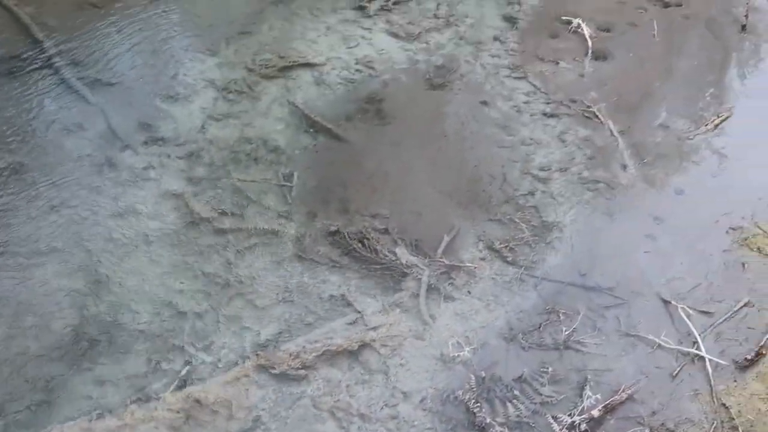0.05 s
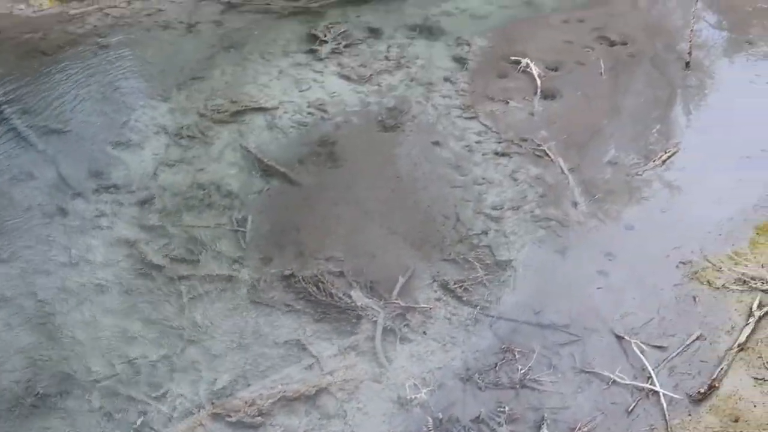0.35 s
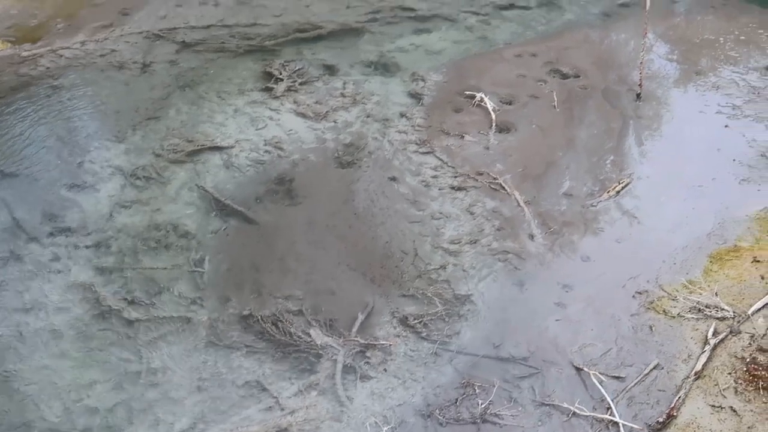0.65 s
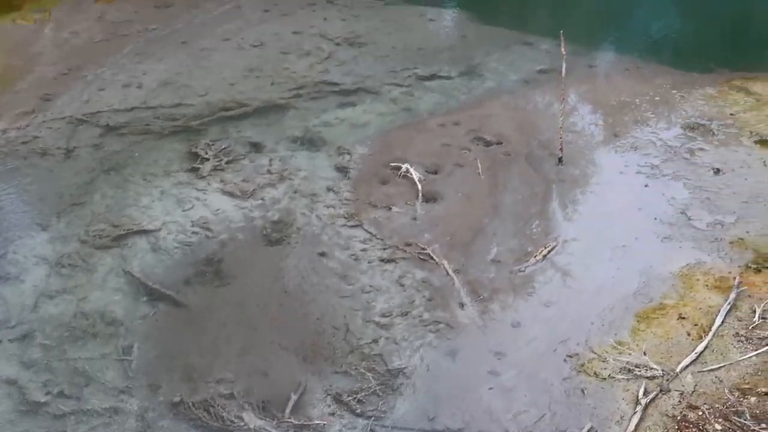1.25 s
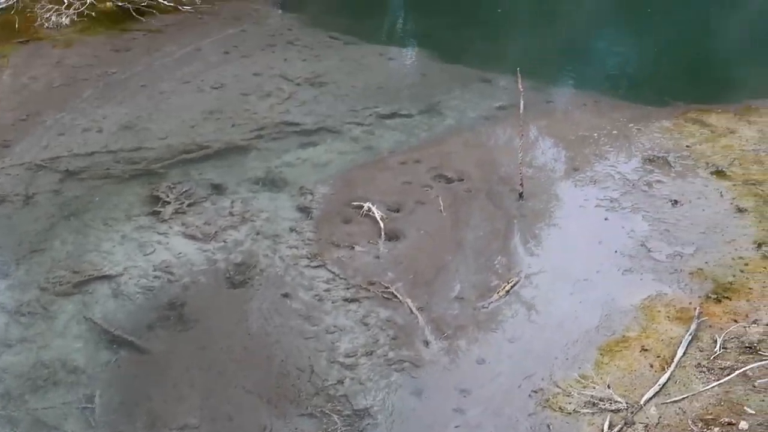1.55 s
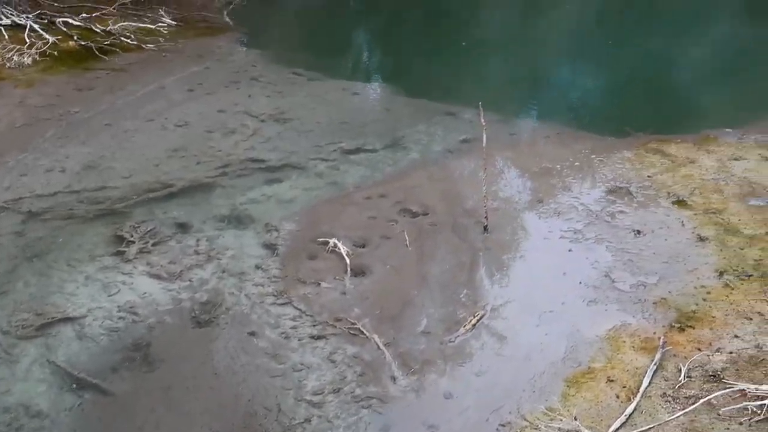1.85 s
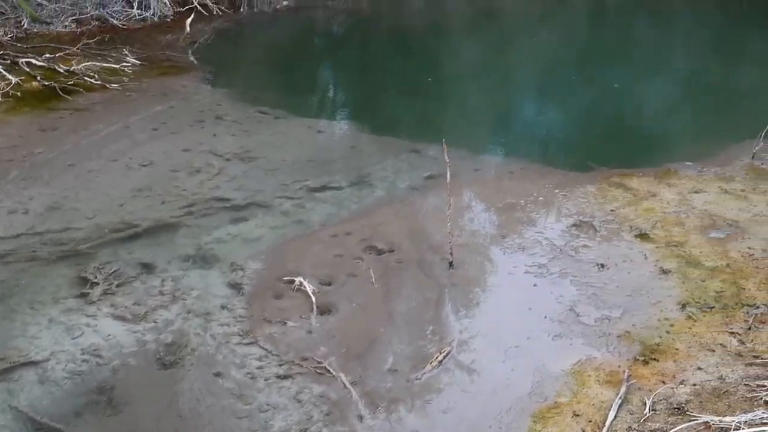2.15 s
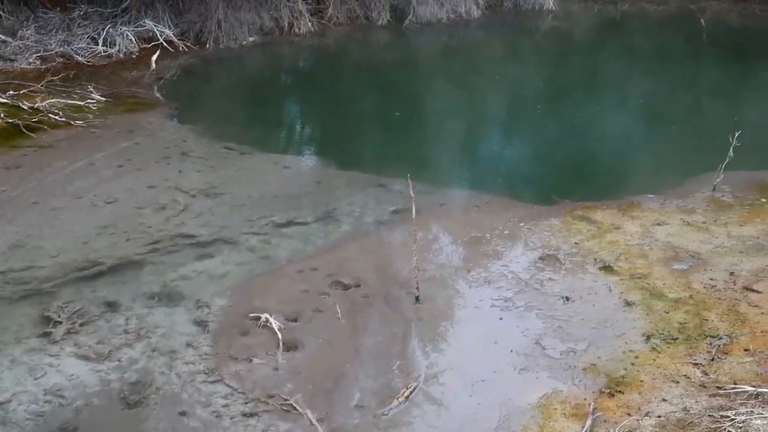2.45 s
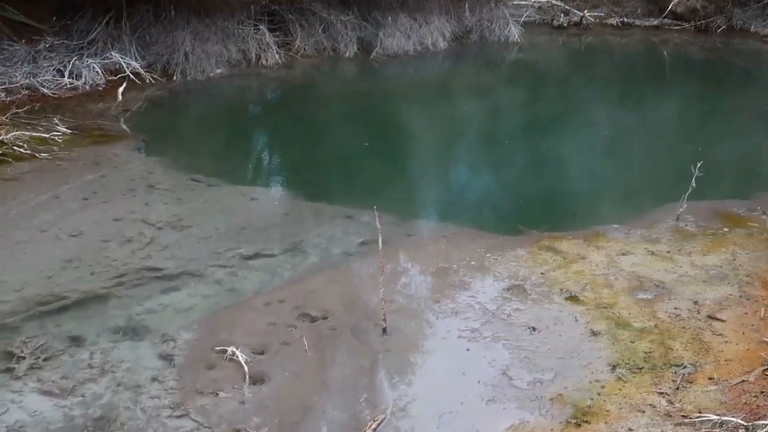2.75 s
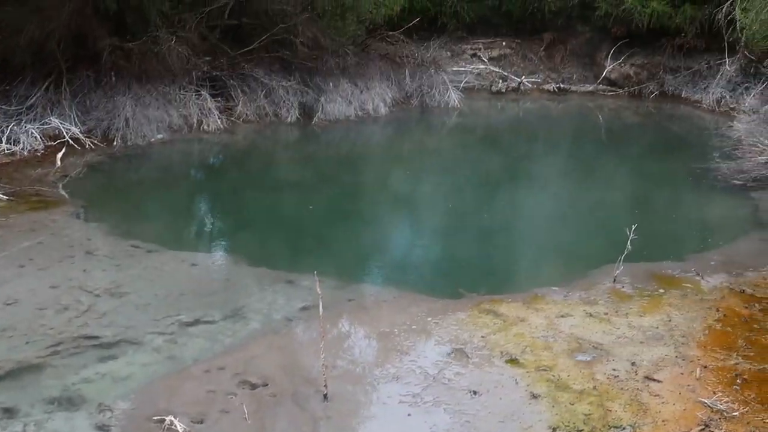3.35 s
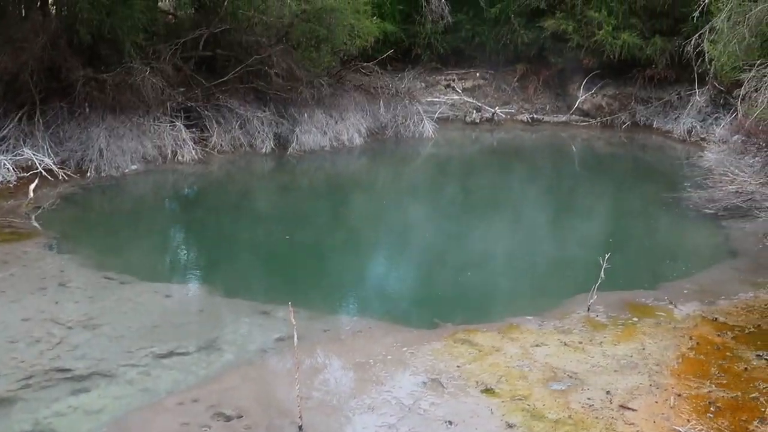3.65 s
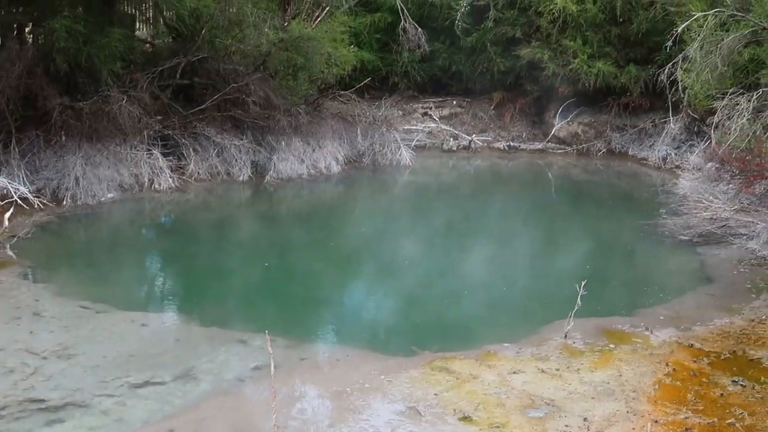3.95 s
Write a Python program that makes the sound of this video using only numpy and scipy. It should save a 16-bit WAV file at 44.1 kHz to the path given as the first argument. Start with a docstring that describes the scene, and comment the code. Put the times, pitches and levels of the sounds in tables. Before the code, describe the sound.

Close plops and wet spatters pop out of simmering mud and water at a hot spring, busy at first, then sparser and fainter. A wide steam hiss fades with them, while a faint breeze rumbles on the microphone outdoors.

```python
"""Plops of hot mud and water, close up, over a dense simmer at the edge of a geothermal pool.
Each gas bubble rings as it surfaces; some glug through a neck of mud, others burst into spatter.
Steam hisses behind them, and light wind bumps the stereo microphone out in the open.
The bubbling grows fainter as the microphone turns away."""
import sys
import numpy as np
from scipy import signal
from scipy.fft import rfft, irfft, next_fast_len
from scipy.io import wavfile
from scipy.ndimage import map_coordinates

SR = 44100
rng = np.random.default_rng(int(sys.argv[2]) if len(sys.argv) > 2 else 0)


def dump_mix(stems):
    """Bounce the given channels to the path in sys.argv[1] as a 16-bit WAV at rate SR."""
    frames = np.atleast_2d(stems).T  # one column per channel
    limited = np.clip(frames, -1, 1)  # hard clip at full scale
    pcm = np.round(limited * 32767).astype(np.int16)
    wavfile.write(sys.argv[1], SR, pcm)


N = 176400

# stereo width of the pool: frequency_hz, side_over_mid_db
POOL_WIDTH = [(100, -27), (500, -16), (1000, -15), (2500, -8.5), (4500, -4), (6500, -1), (9000, 2),
              (12000, 8.5)]
# how the near sounds lean left or right with their pitch: pitch_hz, left_over_right_db
NEAR_PAN = [(300, -4), (650, -0.5), (900, 3.5), (1400, 4.5), (2600, 0)]
# breeze between puffs: time_s, level_db
BREEZE_LEVEL = [(0, -36), (1.5, -48), (2.5, -42), (3.1, -43), (4, -35.5)]
# its rumble on the microphone: frequency_hz, gain_db
BREEZE_COLOUR = [(12, -48), (35, 5), (110, 7), (200, -3.5), (800, -65)]
# its stereo width: frequency_hz, side_over_mid_db
BREEZE_WIDTH = [(30, -20), (140, -12)]
# puffs hitting the microphone: peak_s, half_length_s, level_db, pitch_hz
PUFFS = [(0.091, 0.011, -23.5, 87.5), (0.246, 0.016, -23, 89), (0.293, 0.018, -17, 58.7),
         (0.719, 0.0044, -21, 90), (1.394, 0.054, -25, 59.4), (1.591, 0.022, -27.5, 76.5),
         (2.306, 0.029, -28, 54.3), (2.51, 0.048, -24.5, 85), (3.311, 0.019, -28.5, 75.5),
         (3.377, 0.015, -28, 89), (3.82, 0.022, -30.5, 121), (3.927, 0.02, -26, 118)]
# fading steam: time_s, level_db
STEAM_LEVEL = [(0, -44), (2.3, -46.5), (3.2, -50), (4, -55)]
# its hiss: frequency_hz, gain_db
STEAM_COLOUR = [(1500, 0.5), (3000, 1.5), (4300, -3), (5300, 3.5), (6800, 6.5), (8000, 2.5), (10000, -2.5),
                (12000, -10.5), (15500, -46)]
# strength of the simmer: time_s, bubbles_db, spatter_db
SIMMER_LEVEL = [(0, -35.5, -43.5), (.26, -31, -42), (.5, -35.5, -55), (.78, -33, -40), (1.55, -38, -53),
                (1.8, -36, -47.5), (2.6, -39, -52.5), (2.9, -39, -54.5), (4, -46, -56.5)]
# tone of its small bubbles: frequency_hz, gain_db
SIMMER_COLOUR = [(320, 0), (460, -6), (750, 2.5), (1050, -4), (5000, 8)]
# far bubbling run together: frequency_hz, gain_db
WASH_COLOUR = [(100, 2.5), (300, -6.5), (460, -22), (720, -9), (1100, -16.5), (2900, -22), (4500, -43.5)]
# tiny bubbles popping close by: start_s, centre_hz, level_db
TICKS = [(.388, 2200, -28), (.469, 2300, -20), (.889, 10000, -35), (1.416, 1500, -28), (1.820, 2800, -33),
         (2.1496, 1900, -30), (2.2015, 2190, -31), (2.437, 3100, -31), (2.668, 1600, -29),
         (2.7687, 2500, -31), (2.852, 3200, -34), (3.182, 2800, -31), (3.248, 1800, -34),
         (3.526, 1700, -31), (3.680, 3340, -35), (3.792, 2600, -34)]
# gas pushing up a narrowing neck: start_s, length_s, start_hz, end_hz, level_db
GLUGS = [(.098, .054, 340, 680, -27.5), (1.225, .13, 160, 380, -28), (2.953, .026, 260, 360, -27.5)]
# bursts that throw spatter: start_s, level_db, t60_s, left_over_right_db
SPLATS = [(.218, -30.5, 0.3, -2), (.313, -25.5, 0.096, -3), (0.8303, -16, 0.046, -6.5),
          (.847, -22, 0.097, -3.5), (2.220, -29, 0.073, 2.5), (2.460, -32, 0.044, 3),
          (3.490, -33, 0.088, 2.5)]
# tone of their spray: frequency_hz, gain_db
SPLAT_COLOUR = [(300, 1.5), (1800, 0.5), (3200, 0.5), (5000, -8), (9000, -11), (15000, -45)]
# single bubbles near the microphone: start_s, pitch_hz, level_db, ring_cycles
PLOPS = [(.080, 269, -13, 3.5), (.081, 930, -22.5, 9.6), (.187, 267, -13, 6.5), (.222, 233, -15.5, 4.3),
         (.235, 634, -13.5, 4.4), (.242, 740, -15, 4), (.426, 660, -23.5, 8.4), (0.5749, 790, -10, 10.5),
         (.595, 1220, -18.5, 8.2), (.644, 326, -13.5, 3.2), (.647, 574, -15, 12), (.656, 333, -17, 3.9),
         (.710, 255, -19.5, 3.2), (.758, 675, -13, 3), (.8005, 895, -12.5, 10), (.987, 330, -14, 5.9),
         (.994, 615, -15.5, 3.9), (1.104, 1420, -18, 6), (1.105, 855, -18, 9), (1.110, 820, -19.5, 9.7),
         (1.13, 1310, -28, 14), (1.246, 710, -21, 5.9), (1.262, 760, -24, 9), (1.496, 560, -17, 7),
         (1.609, 586, -31, 2.9), (1.978, 1100, -24.5, 12), (2.341, 726, -31.5, 17), (2.482, 126, -12, 2.2),
         (2.509, 118, -14.5, 4.7), (2.7863, 595, -14.5, 8.4), (2.7863, 2830, -25.5, 25),
         (3.297, 283, -24.5, 5), (3.427, 840, -25.5, 3.6), (3.496, 803, -29, 14), (3.650, 1510, -31, 14),
         (3.667, 714, -29, 7.5), (3.792, 690, -28, 4.5)]


def amp(db):
    """Decibels to gain."""
    return 10 ** (np.asarray(db) / 20)


def unit(x):
    """Scaled to rms 1."""
    return x / np.sqrt(np.mean(x ** 2) + 1e-20)


def along(points, hz):
    """A table's value at hz, read on a log frequency axis."""
    frequencies, values = np.transpose(points)
    return np.interp(np.log(hz + 1), np.log(frequencies + 1), values)


def curves(rows):
    """One value per sample for each column after the time."""
    times, *columns = np.transpose(rows)
    return [np.interp(np.arange(N) / SR, times, column) for column in columns]


def wobble(per_s):
    """A smooth random curve with per_s knots a second."""
    knots = rng.standard_normal(int(N * per_s / SR) + 4)
    return map_coordinates(knots, [np.arange(N) * per_s / SR])


def filtered(x, response):
    """x shaped by a gain that depends on frequency."""
    size = next_fast_len(N + SR // 2)
    return irfft(rfft(x, size) * response(np.fft.rfftfreq(size, 1 / SR)), size)[..., :N]


def stereo(pair, colour, width=POOL_WIDTH):
    """Two unrelated signals as mid and side of a coloured stereo sound of rms 1."""
    def response(hz):
        ratio = amp(along(width, hz))
        return amp(along(colour, hz)) * np.array([np.ones_like(ratio), ratio]) / np.hypot(1, ratio)
    mid, side = filtered(pair, response)
    return unit(np.array([mid + side, mid - side]))


def add(out, start_s, sound, pan_db):
    """Mix a sound in, leaning left by pan_db."""
    part = out[:, max(round(start_s * SR), 0):][:, :len(sound)]
    part += amp([[pan_db / 2], [-pan_db / 2]]) * sound[:part.shape[1]]


def bubble(t, hz, cycles, rise):
    """A bubble swells, rings and climbs by the share rise, dying ever faster as its cavity opens."""
    elapsed, onset_cycles = hz * t, 0.71
    swell = amp(-60 * (elapsed / cycles) ** 2) * (1 - np.exp(-elapsed / onset_cycles))
    ring = np.sin(2 * np.pi * elapsed * (1 + rise * (elapsed / cycles - 1 / 2) / 2))
    return swell / swell.max(axis=-1, keepdims=True) * ring


def swarm(per_s, hz, scatter_db, samples, log_spread=0.467, cycles=6):
    """Bubbles of random size ringing at random moments, rms 1."""
    draws = np.random.default_rng(rng.integers(2 ** 31)).standard_normal((int(per_s * N / SR), 5))
    angle = np.arctan2(draws[:, :1], draws[:, 1:2])  # uniform, so any moment is as likely
    start = ((angle / (2 * np.pi) + 1 / 2) * N).astype(int)
    pitch, level, life = np.clip(draws[:, 2:], -2, 2).T[:, :, None]
    age = np.arange(samples)
    rings = bubble(age / SR, hz * np.exp(log_spread * pitch), cycles * 2 ** (life / 2), rise=0.23)
    rings *= amp(scatter_db * level)
    return unit(np.bincount((start + age).ravel(), rings.ravel(), N)[:N])


def wind():
    """A faint breeze rumbles on the microphone, and short puffs bump it."""
    level_db, = curves(BREEZE_LEVEL)
    gusts = amp(level_db + 5.1 * wobble(14))
    out = gusts * stereo(rng.standard_normal((2, N)), BREEZE_COLOUR, BREEZE_WIDTH)
    size, side_db, db_per_octave = SR // 4, -6, -13.5
    t, hz = (np.arange(size) - size // 2) / SR, np.fft.rfftfreq(size, 1 / SR)
    for peak_s, half_s, db, pitch_hz in PUFFS:
        colour = amp(db_per_octave * np.hypot(np.log2((hz + 1) / pitch_hz), 1 / 2))
        swell = np.exp(-(t / half_s) ** 2 / 2)
        pair = swell * irfft(rfft(rng.standard_normal((2, size))) * colour, size)
        mid, side = pair * np.linalg.norm(swell) / np.linalg.norm(pair, axis=1, keepdims=True)
        puff = amp(db) * np.array([mid + amp(side_db) * side, mid - amp(side_db) * side])
        start = round(peak_s * SR) - size // 2
        part = out[:, max(start, 0):start + size]
        part += puff[:, max(-start, 0):][:, :part.shape[1]]
    return out


def steam():
    """Steam off the pool: a wide, slightly sputtering hiss."""
    level_db, = curves(STEAM_LEVEL)
    sputter_db = 0.65 * wobble(15) + 0.77 * wobble(300)
    return amp(level_db + sputter_db) * stereo(rng.standard_normal((2, N)), STEAM_COLOUR)


def simmer():
    """Countless small bubbles and finer spatter, over the wash of those farther across the pool."""
    bubbles_db, spatter_db = curves(SIMMER_LEVEL)
    surge_db = 1.3 * wobble(29.95)
    small = [swarm(per_s=600, hz=551.4, scatter_db=1.5, samples=1500, log_spread=0.5344, cycles=6.24)
             for _ in range(2)]
    fine = [swarm(per_s=420, hz=1967, scatter_db=3, samples=400) for _ in range(2)]
    bubbles = amp(bubbles_db + surge_db) * stereo(small, SIMMER_COLOUR)
    spatter = amp(spatter_db + surge_db) * stereo(fine, colour=[(3200, -7), (6000, -6)])
    wash = amp(bubbles_db - 3.5) * stereo(rng.standard_normal((2, N)), WASH_COLOUR)
    return bubbles + spatter + wash


def banks(near):
    """The ground and the banks scatter the near sounds back in a short, weak tail."""
    t = np.arange(N) / SR
    level_db, t60_s, rise_s = -14, 0.15, 0.0028
    tail = stereo(rng.standard_normal((2, N)), colour=[(2000, 2), (8000, -9)])
    tail *= amp(-60 * t / t60_s) * (1 - np.exp(-t / rise_s))
    return amp(level_db) * signal.fftconvolve(near, tail / np.linalg.norm(tail[0]), axes=1)[:, :N]


def ticks():
    """Tiny bubbles pop close by with a very short ring: brief, bright ticks."""
    out, t = np.zeros((2, N)), np.arange(SR // 10) / SR
    hz = np.fft.rfftfreq(len(t), 1 / SR)
    t60_s, half_band_octaves = 0.017, 0.38
    envelope = np.sqrt(t) * amp(-60 * t / t60_s)
    for start_s, centre_hz, db in TICKS:
        band = 1 / (1 + (np.log2((hz + 1) / centre_hz) / half_band_octaves) ** 2)
        pop = envelope * irfft(rfft(rng.standard_normal(len(t))) * band, len(t))
        add(out, start_s, amp(db) * pop / np.abs(pop).max(), along(NEAR_PAN, centre_hz))
    return out


def glugs():
    """A gas pocket shrinks as it empties, so its note slides up; the flapping mud neck gurgles."""
    out = np.zeros((2, N))
    flutter_db, waver_share = 3.5, 0.1
    for start_s, length_s, start_hz, end_hz, db in GLUGS:
        progress = np.linspace(0, 1, int(length_s * SR))
        waver, flutter = (wobble(per_s=210)[:len(progress)] for _ in range(2))
        hz = start_hz * (end_hz / start_hz) ** progress * (1 + waver_share * waver)
        note = np.sin(2 * np.pi * np.cumsum(hz) / SR)
        envelope = amp(db + flutter_db * flutter) * signal.windows.tukey(len(note), 1 / 4)
        add(out, start_s, envelope * note, pan_db=0)
    return out


def splats():
    """A burst bubble throws a quickly thinning spray: ringing droplets in mist, landing in clumps."""
    out, t = np.zeros((2, N)), np.arange(SR // 5) / SR
    clump_db, mist_db, rise_share = 3.5, 2.5, 0.035
    droplets = swarm(per_s=2200, hz=2360, scatter_db=0.57, samples=300)
    clumps = amp(clump_db * wobble(per_s=520))
    for k, (start_s, db, t60_s, pan_db) in enumerate(SPLATS):
        span = slice(k * len(t), (k + 1) * len(t))
        mist = amp(mist_db) * rng.standard_normal(len(t))
        spray = unit((droplets[span] + mist) * clumps[span])
        envelope = amp(db + 2.5 - 60 * t / t60_s) * (1 - np.exp(-t / (rise_share * t60_s)))
        add(out, start_s, envelope * spray, pan_db)
    return filtered(out, lambda hz: amp(along(SPLAT_COLOUR, hz)))


def plops():
    """Large bubbles surface near the microphone: the film ticks and the cavity rings."""
    out, t = np.zeros((2, N)), np.arange(SR // 10) / SR
    film_db, film_t60_s, film_top_hz = -18, 0.015, 2200
    lowpass = signal.butter(3, film_top_hz, fs=SR)
    for start_s, hz, db, cycles in PLOPS:
        noise = unit(signal.lfilter(*lowpass, rng.standard_normal(len(t))))
        film = amp(film_db - 60 * t / film_t60_s) * noise
        cavity = bubble(t, hz, cycles, rise=0.09)
        add(out, start_s, amp(db) * (cavity + film), along(NEAR_PAN, hz))
    return out


def scene():
    """From the pool's edge: near bubbles and their scatter, over simmer, steam and wind."""
    near = plops() + ticks() + glugs() + splats()
    return near + banks(near) + simmer() + steam() + wind()


def record(dry):
    """The microphone chain passes nothing above 15.7 kHz."""
    return filtered(dry, lambda hz: hz < 15700)


dry = scene()
out = record(dry)
dump_mix(out)
```